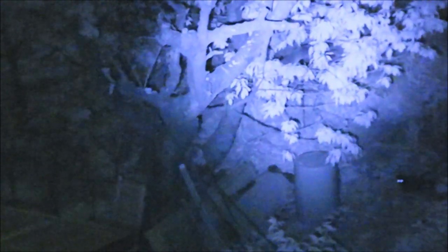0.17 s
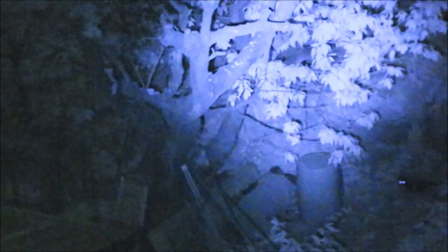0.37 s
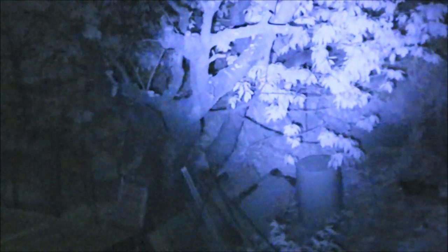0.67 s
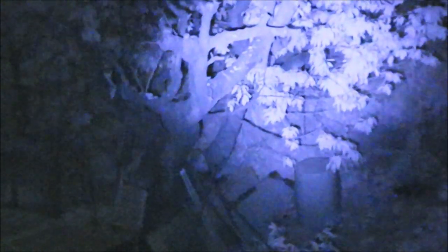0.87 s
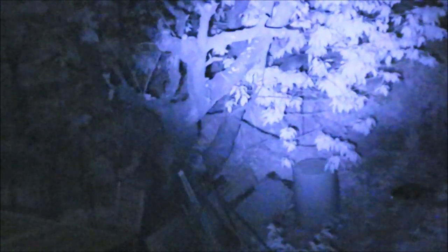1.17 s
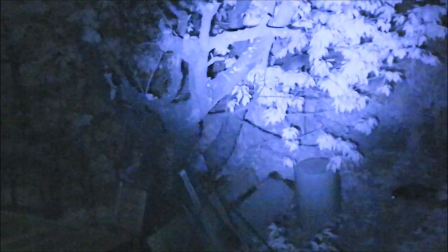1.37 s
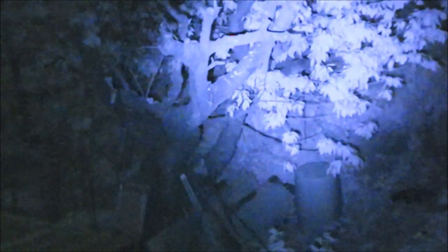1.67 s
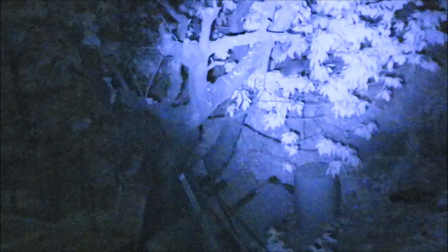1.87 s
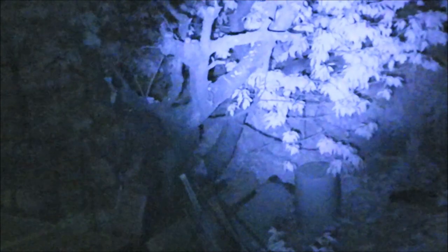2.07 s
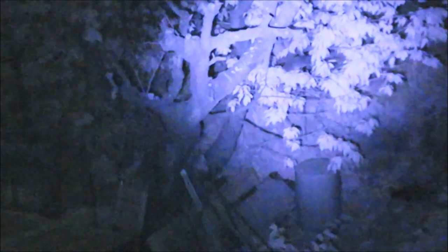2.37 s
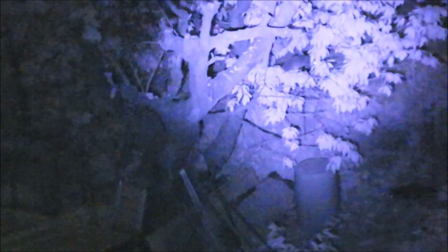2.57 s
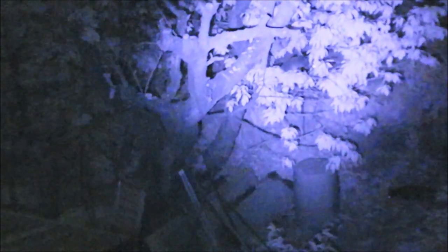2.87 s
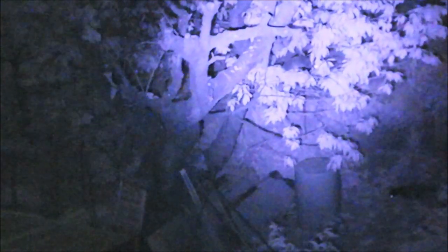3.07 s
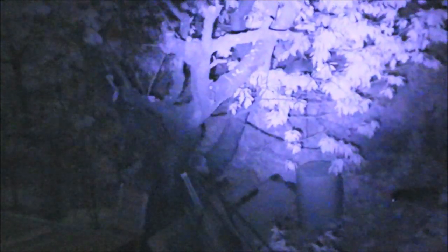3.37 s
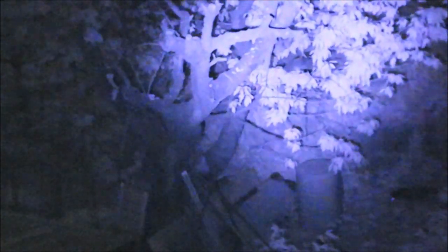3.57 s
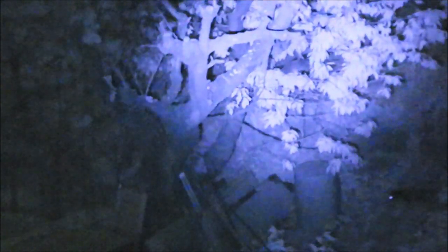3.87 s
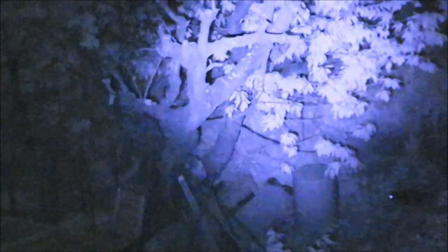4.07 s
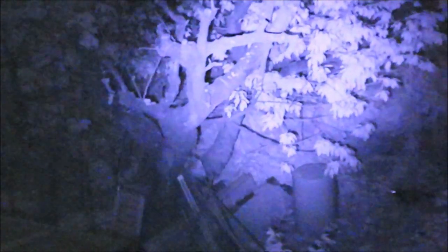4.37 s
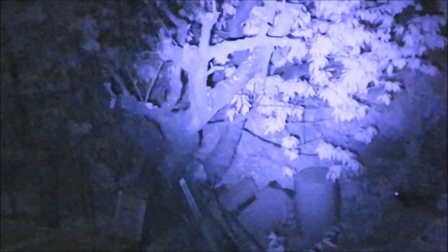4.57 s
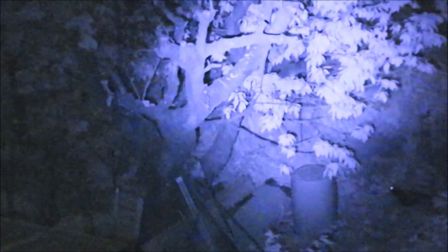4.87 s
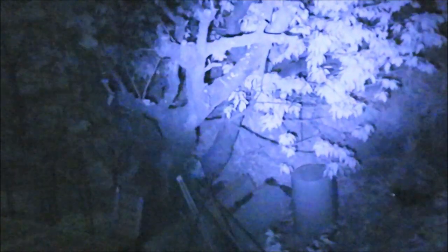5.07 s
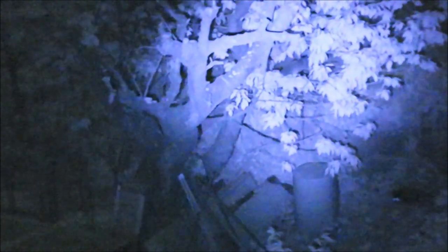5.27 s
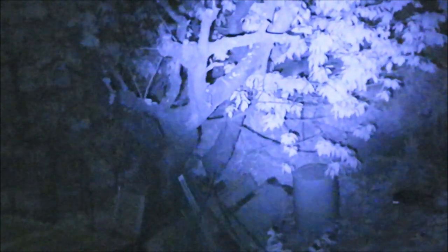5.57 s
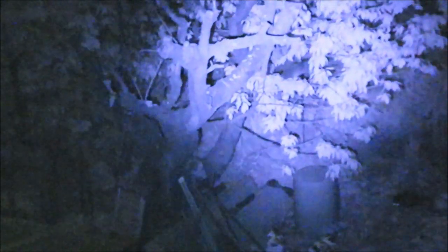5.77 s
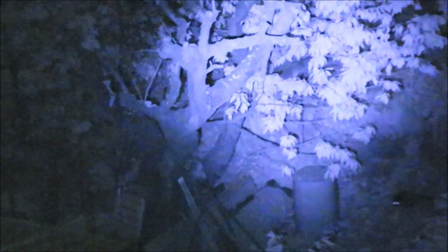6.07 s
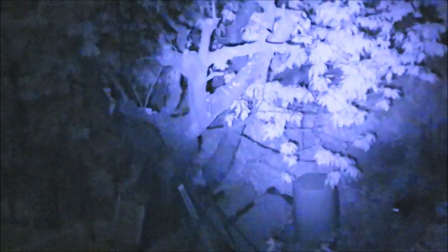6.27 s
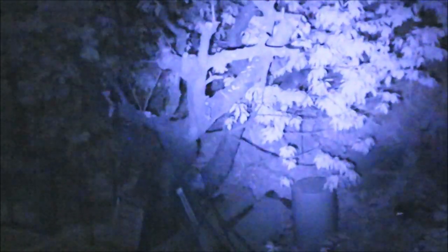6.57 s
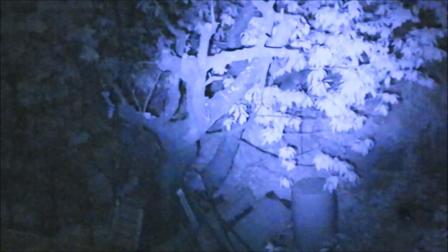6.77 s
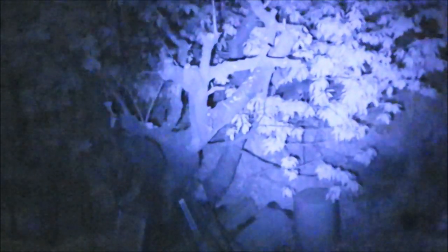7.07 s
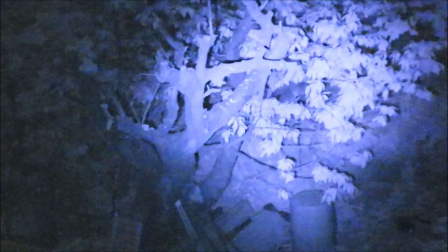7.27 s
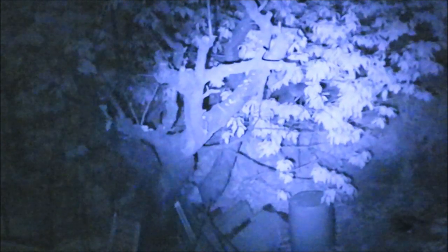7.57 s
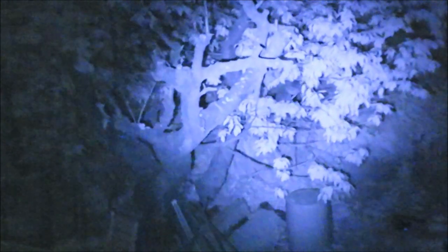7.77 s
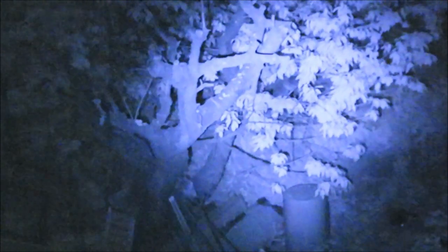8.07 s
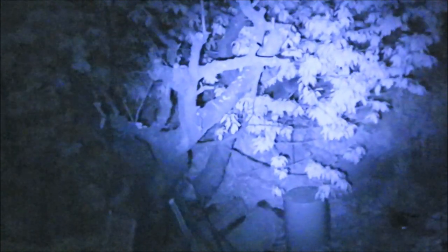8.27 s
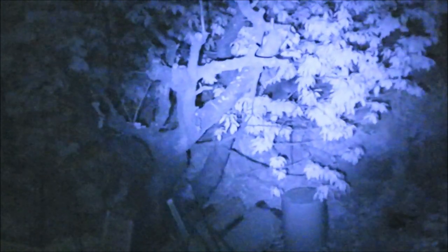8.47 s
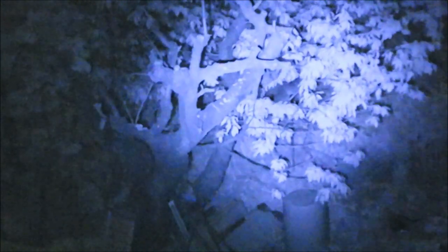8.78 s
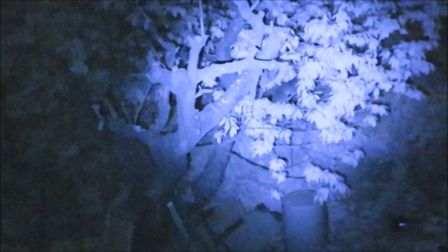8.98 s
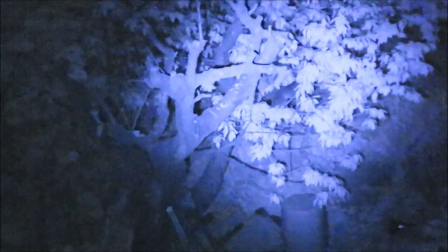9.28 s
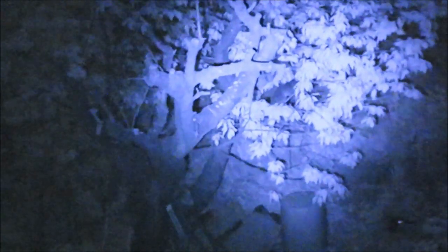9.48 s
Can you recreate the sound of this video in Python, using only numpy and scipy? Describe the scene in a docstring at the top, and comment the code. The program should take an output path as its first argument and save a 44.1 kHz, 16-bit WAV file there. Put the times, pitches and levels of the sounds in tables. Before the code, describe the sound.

Many small frogs call without pause across a yard at night, their short, high trills overlapping slightly to the right. Early on, dry leaves crack underfoot near the microphone, followed by a sharp wooden clack and a softer knock among more crackles. Two faint rustles come later as the chorus carries on. A low wash of far traffic and light microphone hiss lie underneath.

```python
"""From the start, many small frogs call across a yard at night, mostly from the right, over far traffic
and microphone hiss. Each call is a quick run of pulses ringing in a frog's throat and vocal sac.
At 1.5 s leaves crack underfoot nearby, and from 2.1 to 2.4 s wood knocks among more cracks.
Faint rustles follow at 6.7 and 7.6 s, and the frogs keep calling to the end."""
import sys
import numpy as np
from scipy import signal
from scipy.fft import rfft, irfft, next_fast_len
from scipy.io import wavfile
from scipy.ndimage import uniform_filter1d

SR = 44100
rng = np.random.default_rng(int(sys.argv[2]) if len(sys.argv) > 2 else 0)


def dump(signal):
    """Clip the signal to [-1, 1] and save it as 16-bit WAV at the path in sys.argv[1]."""
    limited = np.clip(np.atleast_2d(signal).T, -1, 1)
    pcm = np.round(limited * 32767).astype(np.int16)
    wavfile.write(sys.argv[1], SR, pcm)


N = 425124


def gain_of(db):
    """Turns decibels into a number to multiply by."""
    return 10 ** (np.asarray(db) / 20)


def unit_level(x):
    """Scales a sound to an average power of 1."""
    return x / np.sqrt(np.mean(x ** 2) + 1e-20)


def look_up(table, hz, column=1):
    """Reads a table's column at any frequency, sliding between rows."""
    table = np.array(table)
    return np.interp(np.log(hz + 1), np.log(table[:, 0] + 1), table[:, column])


def shaped_noise(table):
    """Steady noise with the table's balance of low and high sound."""
    gains = gain_of(look_up(table, np.fft.rfftfreq(N, 1 / SR)))
    return unit_level(irfft(rfft(rng.standard_normal(N)) * gains, N))


# How the two microphones compare: frequency_hz, likeness (0 to 1), left_lead_radians, left_over_right_db
MICROPHONES = [(30, .5, -0.5, -2), (100, 0.2, 0.5, -1.5), (354, 0.65, 0., -1.5), (840, 0.69, 0.5, -2.),
               (1157, 0.98, 0., -2.5), (1670, 0.67, -0.5, -3.5), (2240, 0.9, 0.5, -1.5),
               (2800, 0.68, 0.47, -2), (2820, 0.43, 1.27, -4.5), (2920, 0.95, 1.5, -0.5),
               (4420, 0, -0.6, -2.), (4564, 1, 4.5, -6), (6550, 0.09, 2.5, -4)]
def stereo(shared, apart):
    """Both microphones hear the shared sound; the right one also hears an unrelated part."""
    hz = np.fft.rfftfreq(N, 1 / SR)
    likeness = np.clip(look_up(MICROPHONES, hz), 0, 1)
    lag = np.exp(-1j * look_up(MICROPHONES, hz, column=2))
    tilt = gain_of(look_up(MICROPHONES, hz, column=3) / 2)
    left = rfft(shared)
    right = likeness * left * lag + np.sqrt(1 - likeness ** 2) * rfft(apart)
    return irfft(np.array([left * tilt, right / tilt]), N)


# The tone of traffic and air: frequency_hz, relative_level_db
TRAFFIC_TONE = [(12, -40.), (22, -17), (45, -1.5), (60, -2), (100, -0.5), (210, -0.5), (350, -0.5),
                (480, -3.5), (680, -6), (950, -7.5), (2000, -16), (5000, -15.5), (7000, -19.5), (9000, -29)]
# Their slow rise and fall: time_s, level_db
TRAFFIC_SWELL = [(0, -51.5), (1.7, -51), (2.3, -49.5), (3.1, -52.5), (5.2, -50), (6, -51.5), (7, -51.5),
                 (7.68, -50), (8.6, -52), (9.64, -50.5)]
def far_traffic():
    """Far traffic and air blend into a low wash that swells slowly."""
    level_db = np.interp(np.arange(N) / SR, *np.transpose(TRAFFIC_SWELL))
    return gain_of(level_db) * stereo(shaped_noise(TRAFFIC_TONE), shaped_noise(TRAFFIC_TONE))


# Cracks and rustles: start_s, level_db, low_hz, high_hz, rise_s, fade_s (to fall 60 dB), left_over_right_db
LEAF_CRACKS = [(1.548, -30, 4000., 4900., .0006, 0.057, -4), (1.550, -40, 5400., 7800., .0005, .02, 2.),
               (1.551, -39.5, 373, 635, .003, 0.15, -1), (1.958, -39.5, 5500., 8950, .0006, 0.018, -10),
               (2.142, -40, 3000., 7500., .003, 0.064, -3), (2.162, -27, 1480, 4760, 0.004, 0.17, -5),
               (2.215, -41, 4000., 8500, 0.014, 0.13, -9), (2.424, -43, 3470, 6460, .012, 0.13, -3.),
               (6.735, -45, 4240, 7500., 0.0087, 0.21, -8), (7.641, -45.5, 4200., 8400, 0.012, 0.2, -9),
               (7.666, -39, 152, 400., 0.0034, 0.14, -1)]
def leaves():
    """Leaves crack underfoot, each in a burst of grainy noise."""
    out, t = np.zeros((2, N)), np.arange(SR // 4) / SR
    for start_s, level_db, low_hz, high_hz, rise_s, fade_s, pan_db in LEAF_CRACKS:
        clumps = unit_level(uniform_filter1d(rng.standard_normal(len(t)), size=40))
        grain = rng.standard_normal((3, len(t))) * gain_of(2.5 * clumps)
        grain = grain[0] + .5 * grain[1:]  # one shared part, plus one for each side
        band = signal.butter(4, [low_hz, high_hz], "bandpass", fs=SR, output="sos")
        loudness = (1 - np.exp(-t / rise_s)) * gain_of(level_db - 60 * t / fade_s)
        burst = unit_level(signal.sosfilt(band, grain)) * loudness
        out[:, round(start_s * SR):][:, :len(t)] += burst * gain_of([[pan_db / 2], [-pan_db / 2]])
    return out


# Blows on a piece of wood: start_s, level_db
WOOD_BLOWS = [(2.1413, -17.5), (2.1478, -16), (2.153, -25), (2.161, -21), (2.434, -25), (2.443, -28)]
# The notes it rings with: pitch_hz, fade_s (to fall 60 dB), relative_level_db
WOOD_NOTES = [(528, 0.034, -14), (1250, 0.024, -3), (1530, 0.021, 0), (2100, 0.044, -4.5), (2540, 0.047, 0),
              (3390, .025, -2.5), (3900, 0.024, -4.5), (4680, 0.035, -6.5)]
def wood_knocks():
    """Each blow sets the same short notes ringing in the wood, in a slightly different mix."""
    out, t = np.zeros(N), np.arange(SR // 8) / SR
    pitch_hz, fade_s, note_db = np.transpose(WOOD_NOTES)[..., None]
    rise = 1 - np.exp(-t / 0.0002)
    for start_s, level_db in WOOD_BLOWS:
        mix, flip = rng.standard_normal((len(WOOD_NOTES), 2)).T[..., None]
        fades = gain_of(note_db + 2 * mix - 60 * t / fade_s)
        ring = (fades * np.sign(flip) * np.sin(2 * np.pi * pitch_hz * t)).sum(0)
        out[round(start_s * SR):][:len(t)] += gain_of(level_db) * ring * rise / np.sqrt(len(pitch_hz) / 2)
    return out * gain_of([[-.6], [.6]])  # a little to the right


def echoes(fade_s, direct, length):
    """The spectrum of the direct sound plus a dying tail of echoes from trunks, walls and ground."""
    t = np.arange(SR // 8) / SR
    tail = rng.standard_normal(len(t)) * gain_of(-60 * t / fade_s)
    tail = np.sqrt(1 - direct ** 2) * tail / np.linalg.norm(tail)
    tail[0] = direct
    return rfft(tail, length)


# How the vocal sac, throat and higher overtones ring: pitch_ratio, width_hz, relative_level_db
SAC_RINGS = [(1.0, 254, -0.5), (0.776, 377, -15.5)]
THROAT_RINGS = [(.405, 77.6, -0.3), (.45, 103, -0.18), (.53, 166, -0.64), (.63, 243, -1.9)]
OVERTONE_RINGS = [(1.49, 335, 0), (1.7, 424, 2), (2.2, 910, -11.5)]
def pulse(rings, pitch_hz):
    """One pulse rings briefly in a frog; wider rings die sooner."""
    t = np.arange(1024) / SR
    out = 0
    for ratio, width_hz, level_db in rings:
        age = 1.8 * np.pi * width_hz * t
        shape = age ** 2 * np.exp(-age)  # a soft start avoids a click
        tone = np.sin(2 * np.pi * ratio * pitch_hz * t)
        out = out + gain_of(level_db) * shape / np.linalg.norm(shape) * tone
    return out / np.linalg.norm(out)


# The loudness of the far frogs together: time_s, level_db
CROWD_LEVEL = [(0, -32), (1.5, -32), (3, -33), (4.5, -33), (5.5, -33.5), (6.7, -33.5), (8.2, -33.5),
               (9.3, -33.5), (9.64, -32.5)]
# Their short lulls: middle_s, change_db
CROWD_LULLS = [(.48, -2), (3.7, -2), (4.05, -2), (6.63, -3), (6.96, -2), (7.17, 0), (7.43, -5.5),
               (8.06, -2.5), (8.61, -2), (8.83, -1.5)]
def crowd_gain(t, lull_s=0.026):
    """The far crowd slowly gets a little quieter, with brief dips."""
    dips_db = sum(db * np.exp(-((t - middle_s) / lull_s) ** 2) for middle_s, db in CROWD_LULLS)
    return gain_of(np.interp(t, *np.transpose(CROWD_LEVEL)) + dips_db)


FROG_HZ, PULSES_PER_S, CALLS_PER_S, CALL_S = 2778, 118, 2.3, .13  # a typical frog
FAR_FROGS, TICKS_PER_S = 64, 200
# Near calls that stand out: middle_s, pitch_hz, level_db
NEAR_CALLS = [(0.09, 2794, -33.3), (0.185, 2950, -34), (0.309, 2625, -33), (0.32, 2970, -37.5),
              (0.379, 2450, -37), (0.418, 2930, -34.5), (0.548, 2890, -38.5), (0.694, 2550, -32),
              (0.7, 3040, -39), (0.748, 2925, -34), (0.782, 2650, -38), (0.854, 2730, -39),
              (0.943, 2940, -34.5), (1.002, 2450, -35.9), (1.122, 2640, -32), (1.331, 2970, -34.5),
              (1.367, 2616, -33.5), (1.492, 3100, -37), (1.507, 2610, -31.5), (1.655, 2814, -31.8),
              (1.781, 2780, -34), (2.058, 2740, -33.3), (2.234, 2585, -32.5), (2.246, 2940, -35),
              (2.304, 2770, -37.5), (2.365, 2786, -34), (2.464, 2750, -36.5), (2.544, 2725, -33.5),
              (2.629, 2620, -33.5), (2.828, 2710, -35.5), (2.997, 2590, -33.5), (3.023, 3075, -42),
              (3.218, 2516, -37), (3.338, 2790, -35.6), (3.386, 2535, -38), (3.442, 2950, -34.5),
              (3.603, 2695, -36.5), (3.836, 2650, -34.5), (3.856, 2975, -33.5), (3.986, 2664, -35.5),
              (4.135, 2816, -34), (4.196, 2590, -35), (4.346, 2670, -34.5), (4.446, 2640, -36.5),
              (4.505, 2934, -34.5), (4.719, 2955, -36.5), (4.744, 2650, -34.6), (4.845, 2940, -34),
              (4.99, 2750, -35.5), (5.183, 2975, -35), (5.242, 2750, -32.5), (5.313, 2876, -36),
              (5.498, 2915, -35), (5.566, 2494, -37), (5.622, 2905, -32.8), (5.657, 2650, -39),
              (5.768, 2820, -37), (6.011, 2610, -31.5), (6.156, 3000, -39), (6.311, 2620, -33),
              (6.445, 3030, -38), (6.54, 2625, -36), (6.693, 2700, -34.5), (6.87, 2566, -34),
              (7.074, 2596, -35), (7.234, 2520, -36), (7.372, 2687, -32), (7.647, 2610, -33.5),
              (7.921, 2725, -35), (7.976, 2630, -35.5), (8.191, 2684, -34), (8.332, 2450, -39),
              (8.381, 2975, -38), (8.521, 2744, -37.5), (8.714, 2600, -34.1), (8.725, 2984, -33.5),
              (8.795, 2816, -36.5), (9.023, 2663, -32), (9.185, 2975, -36), (9.345, 2640, -34)]
def calls(t):
    """Far frogs repeat in their own rhythms, near calls come singly; each swells, slides up and fades."""
    nearness, slowness, head_start = rng.standard_normal((FAR_FROGS, 3)).T[..., None]
    period_s = (1 + .15 * slowness) / CALLS_PER_S
    middle_s, near_hz, near_db = np.transpose(NEAR_CALLS)[..., None]
    age_s = np.vstack([(t + 10 * head_start) % period_s, t - middle_s + CALL_S / 2])  # far rows first
    progress = np.clip(age_s / CALL_S, 0, 1)
    far_pitch = 1 + .068 * np.sqrt(3) * np.linspace(-1, 1, FAR_FROGS)[:, None]  # big frogs to small
    pitch_ratio = np.vstack([far_pitch, near_hz / FROG_HZ]) + .05 * (progress - .5)
    rate = PULSES_PER_S * (1 + .12 * rng.standard_normal((len(progress), 1)))
    rate = rate * (1 + .05 * progress)  # quickens through the call
    strength = np.sin(np.pi * progress) * gain_of(np.vstack([2.5 * nearness, near_db]))
    strength *= np.sqrt(SR / rate)  # equally loud however fast the pulses come
    crowd_power = (strength[:FAR_FROGS] ** 2 * rate[:FAR_FROGS]).sum(0) / SR
    strength[:FAR_FROGS] *= crowd_gain(t) / np.sqrt(crowd_power)  # the crowd fills its own gaps
    return strength, pitch_ratio, np.cumsum(rate, axis=1) / TICKS_PER_S


def frogs():
    """Runs of pulses ring in each frog's sac and throat, then echo around the yard."""
    far_mix_db, near_mix_db = (0, -11.5, -13), (0, -16.5, -14.5)  # sac, throat, overtones
    t = np.arange(0, N / SR, 1 / TICKS_PER_S)
    ratios = np.linspace(.84, 1.18, 28)  # pulses of similar pitch share one shape
    runs = np.zeros((3, len(ratios), N))
    for frog, (strength, pitch_ratio, pulses_so_far) in enumerate(zip(*calls(t))):
        pulse_s = np.interp(np.arange(1, pulses_so_far[-1]), pulses_so_far, t)
        wobble_s = .00006 * rng.standard_normal(len(t))[:len(pulse_s)]
        pulse_s = np.clip(pulse_s + wobble_s, 0, t[-1])
        pulse_ratio = np.interp(pulse_s, t, pitch_ratio)
        row = np.round(np.interp(pulse_ratio, ratios, np.arange(len(ratios)))).astype(int)
        mix = gain_of(far_mix_db if frog < FAR_FROGS else near_mix_db)
        runs[:, row, (pulse_s * SR).astype(int)] += np.outer(mix, np.interp(pulse_s, t, strength))
    shared, apart, length = 0, 0, next_fast_len(N + SR // 4)
    for sac, throat, overtones, ratio in zip(*runs, ratios):
        throat_ratio = ratio ** 0.31  # the throat only partly follows the pitch
        voice = rfft(sac, length) * rfft(pulse(SAC_RINGS, FROG_HZ * ratio), length)
        voice += rfft(throat, length) * rfft(pulse(THROAT_RINGS, FROG_HZ * throat_ratio), length)
        voice += rfft(overtones, length) * rfft(pulse(OVERTONE_RINGS, FROG_HZ * ratio), length)
        shared += voice * echoes(fade_s=0.1, direct=0.838, length=length)
        apart += voice * echoes(fade_s=0.052, direct=0, length=length)
    return stereo(*irfft(np.array([shared, apart]), length)[:, :N])


def scene():
    """Everything that reaches the microphones."""
    return frogs() + leaves() + wood_knocks() + far_traffic()


# The tone of the microphone hiss: frequency_hz, relative_level_db
HISS_TONE = [(4820, -8), (8200, -0.5), (15100, -2), (15700, -2.5)]
def record(dry):
    """Each microphone adds hiss; a thin slice of the treble and the very highest sounds are cut."""
    hiss_db, notch_hz, notch_width_hz, top_hz = -56.5, 7725, 130, 15800
    hissy = dry + gain_of(hiss_db) * np.array([shaped_noise(HISS_TONE), shaped_noise(HISS_TONE)])
    notch = signal.iirnotch(notch_hz, notch_hz / notch_width_hz, SR)
    notched = signal.lfilter(*notch, signal.lfilter(*notch, hissy))
    top_cut = signal.firwin(1023, top_hz, window=("kaiser", 10), fs=SR)
    return signal.oaconvolve(notched, top_cut[None], "same")


dry = scene()
out = record(dry)
dump(out)
```